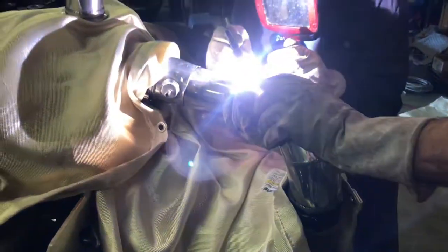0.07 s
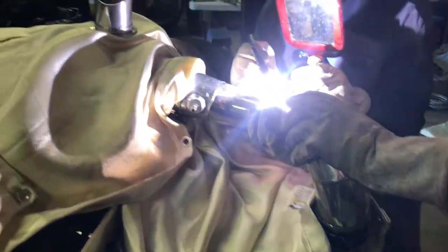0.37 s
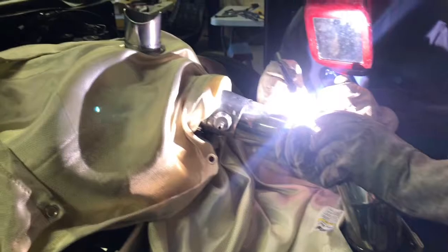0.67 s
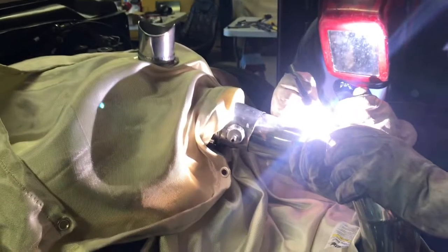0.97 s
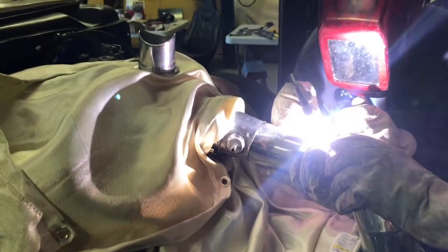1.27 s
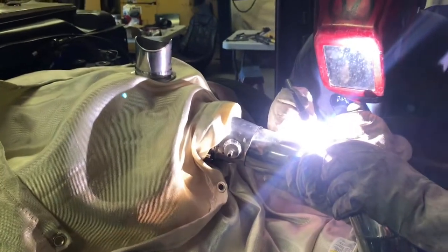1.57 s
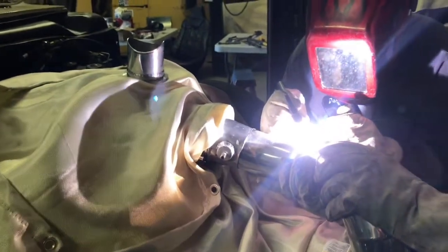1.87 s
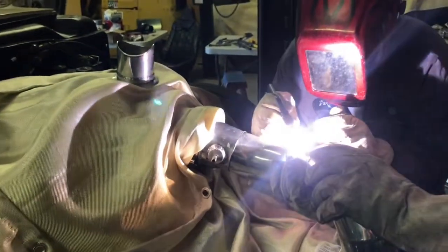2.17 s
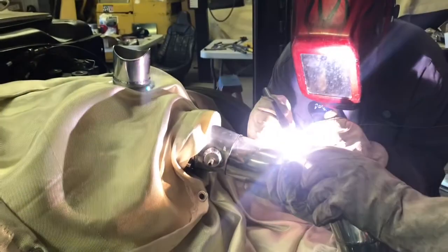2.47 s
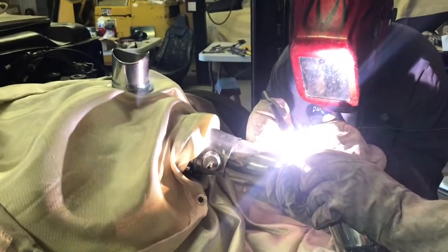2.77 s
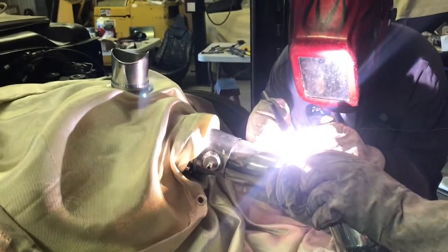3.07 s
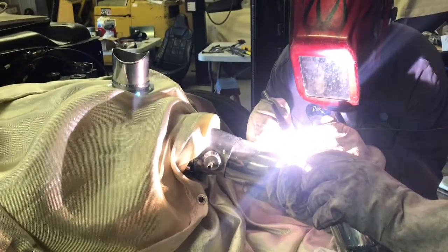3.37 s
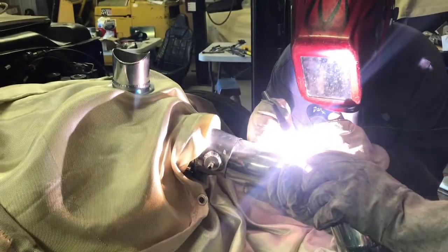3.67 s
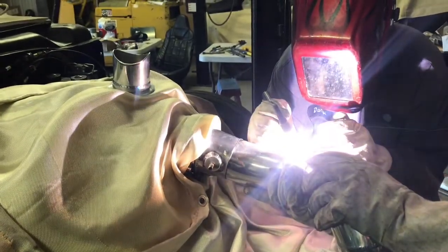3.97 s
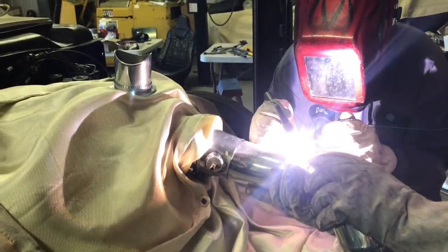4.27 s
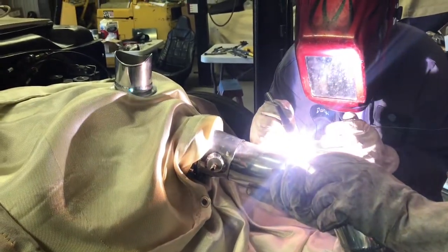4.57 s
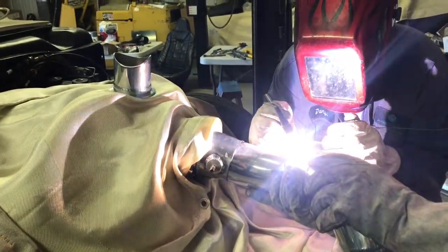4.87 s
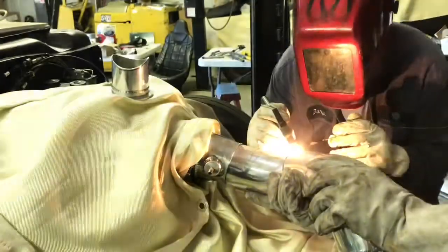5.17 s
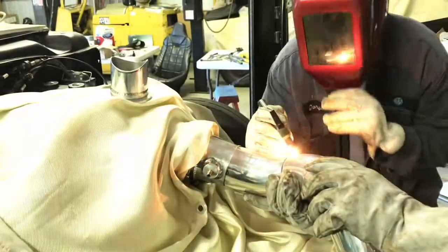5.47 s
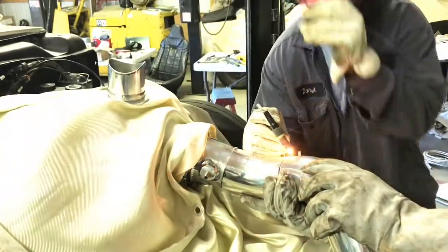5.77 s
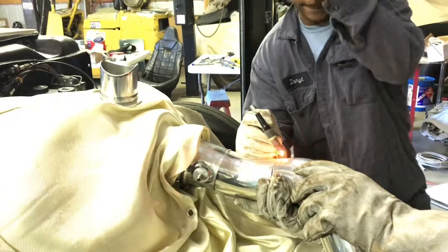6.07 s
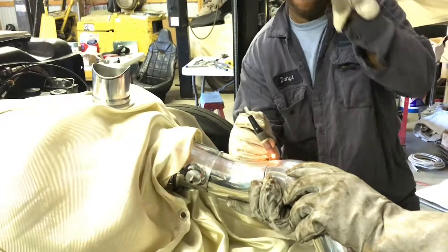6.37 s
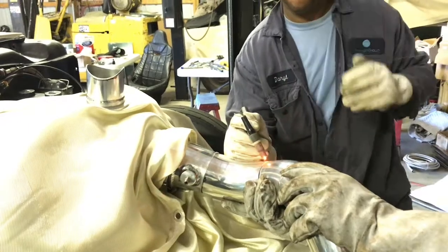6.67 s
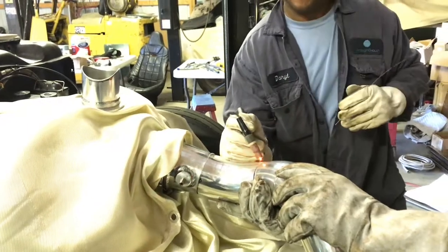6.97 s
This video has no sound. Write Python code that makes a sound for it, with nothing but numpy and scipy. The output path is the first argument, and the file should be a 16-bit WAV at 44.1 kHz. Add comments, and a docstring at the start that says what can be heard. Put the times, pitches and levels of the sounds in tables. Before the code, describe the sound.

An electric welding arc buzzes and hisses with sharp snaps, then cuts off, leaving the machine's quiet fan hum.

```python
"""AC TIG welding on a metal pipe

Twice in each mains cycle the arc dies and strikes again with a snap. It hisses as it strips the oxide
off the metal, and its pulsing heat hums at twice the mains rate. Snaps and hiss ring in the torch's cup
and echo round the workshop. The current is eased off, the starter sparks sputter and stop, and what
remains is the machine's fan and the flow of shielding gas."""
import sys
import numpy as np
from scipy import signal
from scipy.fft import rfft, irfft
from scipy.io import wavfile
from scipy.ndimage import map_coordinates

SR = 44100
rng = np.random.default_rng(int(sys.argv[2]) if len(sys.argv) > 2 else 0)


def unload_wav(signal):
    """Save mono or channel-first audio to the path in sys.argv[1] as 16-bit WAV at rate SR, clipped to [-1, 1]."""
    wavfile.write(
        sys.argv[1],
        SR,
        np.round(np.clip(np.atleast_2d(signal).T, -1, 1) * 32767).astype(np.int16),
    )


N = 318402
MS = .001
MAINS_HZ, FIRST_CYCLE_S, ARC_OFF_S = 59.9836, .01265, 5.171
TIME = np.arange(N) / SR
FREQS = np.fft.rfftfreq(N, 1 / SR)
CYCLE_STARTS = np.arange(FIRST_CYCLE_S, ARC_OFF_S, 1 / MAINS_HZ)  # the current turns positive
MS_INTO_CYCLE = (TIME - FIRST_CYCLE_S) % (1 / MAINS_HZ) / MS


def amp(db):
    """Turns decibels into a gain."""
    return 10 ** (np.asarray(db) / 20)


def unit(x):
    """Scales a signal to an average strength (rms) of 1."""
    return x / np.sqrt(np.mean(x ** 2) + 1e-20)


def curve(rows, t):
    """Reads a table's columns at the times t, along straight lines between its rows."""
    times, *columns = np.transpose(rows)
    return [np.interp(t, times, column) for column in columns]


def spectrum(rows, hz):
    """Reads a table at the frequencies hz, on a scale of octaves."""
    freqs, values = np.transpose(rows)
    return np.interp(np.log(hz + 1), np.log(freqs), values)


def noise(gain):
    """Noise of strength 1, coloured by a gain for each frequency."""
    return unit(irfft(rfft(rng.standard_normal(N)) * gain, N))


# how loud the low rumble is (time [s], level [dB])
RUMBLE_LEVEL = [(0, -80), (5.1, -66), (5.4, -53), (5.9, -56), (6.2, -67), (7.2, -60)]

def rumble(low_hz=54, width_hz=18):
    """A low rumble swells a little once the arc is out."""
    return noise(np.exp(-((FREQS - low_hz) / width_hz) ** 2)) * amp(curve(RUMBLE_LEVEL, TIME)[0])


# the notes of the machine's casing (frequency [Hz], width [Hz], level [dB])
CASING_NOTES = [(120, 4, -51), (182, 8.6, -63), (196.1, 7, -52), (274.2, 5, -55.5), (312, 18, -56),
                (355, 17, -58), (386, 6.9, -58), (585, 22, -64), (880, 22, -65), (956, 45, -59),
                (1342, 26, -59), (1460, 64, -69)]

def casing():
    """The machine's panels and ducts whirr, each at its own note."""
    power = 0
    for hz, width, db in CASING_NOTES:
        peak = 1 / (1 + (2 * (FREQS - hz) / width) ** 2)
        power += (amp(db) * unit(peak)) ** 2
    return np.sqrt(power.mean()) * noise(np.sqrt(power))


# the tone of the fan's blades (time [s], pitch [Hz], level [dB])
BLADE_TONE = [(0.3, 133.8, -36), (2.5, 134.7, -33.5), (5.0, 134.7, -34), (5.3, 135.4, -29.5),
              (6.0, 134.2, -29), (7.0, 136.6, -29.5)]
# the colour of the rushing air (frequency [Hz], relative level [dB])
AIR_COLOUR = [(20, -39), (55, -1), (100, 5), (170, 9), (230, -4.5), (330, 2.5), (450, -5.5), (780, -8.5),
              (920, -8.5), (1400, -9), (1500, -11.5), (2700, -18.5), (6500, -30), (15500, -32)]

def fan(rush_db=-41):
    """The cooling fan's passing blades make a tone, and the air they push makes a rush."""
    blade_hz, level_db = curve(BLADE_TONE, TIME)
    blades = unit(np.sin(2 * np.pi * np.cumsum(blade_hz) / SR)) * amp(level_db)
    return blades + amp(rush_db) * noise(amp(spectrum(AIR_COLOUR, FREQS)))


# the whistle of gas in the nozzle (frequency [Hz], relative level [dB])
GAS_COLOUR = [(2800, -11), (3700, 8), (4500, 6.5), (5050, -9), (5450, -1), (6400, -41), (8300, -6),
              (9600, 1.5), (10300, -10), (11300, -0.5), (12500, -1), (13800, -30), (15500, -54)]
# the echo off the helmet as it is lifted away (time [s], delay [ms], gain)
HELMET_ECHO = [(5.15, .5, .5), (5.4, .8, .55), (5.65, 1.15, .4), (6.0, 1.5, .1)]

def gas(level_db=-53.0):
    """Shielding gas flows throughout; the helmet's ever later echo makes it swish downward."""
    flow = amp(level_db) * noise(amp(spectrum(GAS_COLOUR, FREQS)))
    delay_ms, gain = curve(HELMET_ECHO, TIME)
    echo = map_coordinates(flow, [(TIME - delay_ms * MS) * SR], order=3)
    return flow + gain * echo


# how long the workshop echoes (frequency [Hz], time to fade by 60 dB [s])
ROOM_FADE = [(200, 0.28), (1500, 0.54), (4500, 0.22), (9000, 0.4), (15000, 0.58)]

def room_echoes(first_ms=4, tilt_db=-2):
    """The room answers a click with a crowd of echoes; each frequency fades at its own pace."""
    t = np.arange(SR) / SR
    echoes = rng.standard_normal(SR) * (rng.random(SR) < .1) * (t > first_ms * MS)
    hz, t, bands = signal.stft(echoes, SR, nperseg=256)
    fade_db = -60 * t / spectrum(ROOM_FADE, hz)[:, None]
    dull_db = tilt_db * np.log2(1 + hz / 2000)[:, None]
    echoes = signal.istft(bands * amp(fade_db + dull_db), SR, nperseg=256)[1]
    return echoes / np.linalg.norm(echoes)


def workshop(sound, echo_db=-11, sway_hz=0.13):
    """One pattern of room echoes slowly gives way to another."""
    angle = 2 * np.pi * sway_hz * TIME
    first, second = (signal.oaconvolve(sound, room_echoes())[:N] for _ in range(2))
    return amp(echo_db) * (np.cos(angle) * first + np.sin(angle) * second)


# the hum, loud from the arc and faint from the idling machine (time [s], level [dB])
HUM_LEVEL = [(0.1, -20.5), (1.9, -20.5), (2.5, -23.5), (3.1, -23), (4.95, -23), (5.08, -27.5), (5.17, -33),
             (5.3, -35), (5.5, -53), (7.1, -46)]
# the tones in the hum (multiple of the mains rate, relative level [dB])
HUM_TONES = [(2, 1.5), (3, -31.5), (4, -29), (6, -26.5), (8, -44), (9, -32), (16, -41.5), (18, -50)]

def hum():
    """The hot arc swells with each half cycle; unequal halves add the odd multiples."""
    angle = 2 * np.pi * MAINS_HZ * (TIME - FIRST_CYCLE_S)
    tone = sum(amp(db) * np.sin(round(multiple) * angle) for multiple, db in HUM_TONES)
    return unit(tone) * amp(curve(HUM_LEVEL, TIME)[0])


# the arc's colour between cup, pipe and gloves (frequency [Hz], relative level [dB])
ARC_TONE = [(200, -31), (600, -31.5), (1250, -18), (1650, -7.5), (2100, -17.5), (2900, -19), (3700, -6),
            (4450, -0.5), (5050, -10.5), (5700, -4.5), (6800, -14.5), (8500, -1), (10600, -15.5),
            (15800, -17)]
# the ringing of the cup and the pipe's mouth (frequency [Hz], width [Hz], relative level [dB])
CUP_NOTES = [(1003, 197, -13), (2326, 66, -11), (7880, 750, -9), (9190, 310, -3), (11430, 820, -11.5),
             (13130, 1360, -8.5)]
# the torch turns along the seam (time [s], treble beamed from the cup [dB], mids past the glove [dB])
TORCH_AIM = [(0, -1.5, -3.5), (1.4, -3, -5), (2.2, 1, -2), (2.8, 0.5, -0.5), (3.3, 0.5, 0.5),
             (4.0, -0.5, 0), (4.35, 2.5, -0.5), (4.9, -1, 1), (5.15, 2.5, -4.5)]

def cup_ring(time_s, hz, cold_hz):
    """The torch's cup rings briefly, and its colour changes with where it points."""
    power = amp(spectrum(ARC_TONE, cold_hz)) ** 2
    for note_hz, width, db in CUP_NOTES:
        power += amp(db) ** 2 / (1 + (2 * (cold_hz - note_hz) / width) ** 2) ** 2
    treble_db, mids_db = curve(TORCH_AIM, time_s)
    power *= amp(treble_db * np.exp(-((hz - 8450) / 900) ** 2)) ** 2
    power *= amp(mids_db * np.exp(-((hz - 1300) / 700) ** 2)) ** 2
    log_gain = .5 * np.log(np.r_[power, power[-2:0:-1]])
    return np.exp(np.conj(signal.hilbert(log_gain)))[:len(hz)]  # no ringing before the strike


# hot gas carries sound faster and raises the cup's notes (time [s], pitch factor)
CUP_HEAT = [(0, 0.98), (1.6, 0.99), (2.4, 1.005), (4.0, 1.02), (4.3, 1.037), (4.95, 1.016), (5.17, 0.976)]
# echoes off the pipe and the helmet (delay [ms], gain)
NEAR_ECHOES = [(0.699, 0.099), (1.352, 0.058), (2.4, 0.017)]
# the echo off the moving hand that feeds the filler rod (time [s], delay [ms], gain)
HAND_ECHO = [(0, 0.86, .2), (1.8, 0.814, 0.058), (4.0, 0.83, 0.02), (4.4, 0.74, 0.11), (5.15, 0.77, 0.19)]

def torch_response(time_s, bounce=0.94, bounce_ms=.23, size=2048):
    """A click at this moment rings round the cup and bounces off pipe, helmet and hand."""
    hz = np.fft.rfftfreq(size, 1 / SR)
    cold_hz = hz / curve(CUP_HEAT, time_s)[0]
    response = cup_ring(time_s, hz, cold_hz)
    trip = np.exp(-2j * np.pi * hz * bounce_ms * MS)
    response *= (bounce + trip) / (1 + bounce * trip)  # trips from cup to pipe only smear it in time
    echoes = [*NEAR_ECHOES, curve(HAND_ECHO, time_s)]
    response *= 1 + sum(gain * np.exp(-2j * np.pi * cold_hz * ms * MS) for ms, gain in echoes)
    ring = irfft(response)
    return ring / np.linalg.norm(ring)


def torch(sound, size=4096):
    """Overlapping pieces of the arc's sound pass through the cup as it is just then."""
    out, window = np.zeros(N + size), signal.get_window("hann", size)
    padded = np.r_[np.zeros(size // 2), sound]
    for start in range(0, int(ARC_OFF_S * SR) + size, size // 2):
        piece = signal.fftconvolve(padded[start:start + size] * window, torch_response(start / SR))
        out[start:start + len(piece)] += piece
    return out[size // 2:][:N]


# the starter sparks as the arc fails (time [s], relative level [dB])
SPARK_LEVEL = [(4.95, -47), (5.0, -47), (5.08, -24), (5.11, -23), (5.15, -17.5), (5.17, -22)]

def sparks(first_ms=1.2, second_ms=9.0, half_width_ms=2.0, density=0.32, brightness=0.96):
    """A burst of tiny, bright starter sparks bridges each gap in the failing arc."""
    centres_ms = (first_ms, second_ms, first_ms + 1 / MAINS_HZ / MS)
    bursts = sum(np.exp(-((MS_INTO_CYCLE - ms) / half_width_ms) ** 2) for ms in centres_ms)
    crackle = rng.standard_normal(N) * (rng.random(N) < density)
    crackle = unit(signal.lfilter([1, -brightness], [1], crackle))
    failing = (TIME > SPARK_LEVEL[0][0]) & (TIME < ARC_OFF_S)
    return crackle * bursts * amp(curve(SPARK_LEVEL, TIME)[0]) * failing


# the hiss builds as the arc strips the oxide and drops suddenly when the filler rod is dipped (time [s],
# relative level [dB])
HISS_LEVEL = [(0, -26.5), (0.2, -28), (0.73, -24.3), (0.95, -25), (1.05, -28), (1.55, -30), (1.92, -22),
              (2.2, -30), (2.92, -27), (3.21, -17), (3.45, -21), (4.06, -21.5), (4.11, -30), (4.32, -26),
              (4.78, -21.5), (4.88, -27.5), (5.17, -32)]

def oxide_hiss(boost_db=0.47, flutter_db=2.1, cleaning_ms=7, rest_db=-20, body_db=-12, body_hz=2200):
    """Arc spots race over the oxide while the electrode is positive; harder work sounds fuller."""
    hiss_db = curve(HISS_LEVEL, TIME)[0]
    pulses = np.exp(-abs(2 * MS_INTO_CYCLE / cleaning_ms - 1) ** 6) + amp(rest_db)
    fullness = amp(body_db + 0.099 * (hiss_db - hiss_db.max()))
    body = noise(np.exp(-(FREQS / body_hz) ** 2)) * fullness
    hiss = rng.standard_normal(N) + body
    flutter = noise(np.exp(-(FREQS / 200) ** 2))  # random wobble, up to about 200 Hz
    return hiss * pulses * amp(boost_db + hiss_db + flutter_db * flutter) * (TIME < ARC_OFF_S)


def clicks(times, gains, lengths_s, fizz=0.056, fizz_ms=0.62, size=64):
    """Short bell-shaped puffs of pressure, each followed by its own wisp of fizz."""
    hz = np.fft.rfftfreq(2 * size, 1 / SR)
    samples = (times * SR).astype(int)
    centre_s = (times - (samples - size) / SR)[:, None]  # a puff can fall between two samples
    omega = 2 * np.pi * hz
    bells = np.exp(-1j * omega * centre_s - .5 * (omega * lengths_s[:, None]) ** 2)
    puffs = irfft(bells * (1 - (2 * hz / SR) ** 8), axis=1)  # soften the very top of the treble
    age_s = np.arange(2 * size) / SR - centre_s
    puffs += fizz * rng.standard_normal(puffs.shape) * np.exp(-abs(age_s) / (fizz_ms * MS)) * (age_s > 0)
    out = np.zeros(N)
    np.add.at(out, samples[:, None] + np.arange(-size, size), puffs * gains[:, None])
    return out


# runs of hard snaps (time [s], number of snaps, spacing [mains cycles], relative level [dB])
SNAP_RUNS = [(0.146, 2, 9, 6.7), (1.98, 2, 1, 7.4), (2.08, 2, 1, 7.9), (2.347, 1, 1, 7.7),
             (2.53, 2, 1, 6.2), (2.713, 3, 3, 7.3), (3.38, 2, 1, 6), (3.447, 2, 3, 7.9), (3.48, 2, 3, 7.6),
             (3.68, 3, 1, 8.2), (3.764, 2, 1, 8.2), (3.964, 2, 1, 5.3), (4.064, 1, 1, 7), (4.33, 2, 3, 7),
             (4.364, 4, 3, 7.4), (4.531, 4, 3, 7.6), (4.747, 2, 1, 7.7), (4.814, 2, 3, 7), (4.931, 1, 1, 6),
             (4.964, 2, 1, 4), (5.047, 2, 1, 3.3)]

def with_snaps(level_db, falter_db=-5, after_db=0.5, after_cycles=3):
    """The arc falters just before a hard snap; the few strikes after a run are a touch louder."""
    level_db = level_db.copy()
    runs = []
    for time_s, count, spacing, db in SNAP_RUNS:
        cycles = np.argmin(abs(CYCLE_STARTS - time_s)) + round(spacing) * np.arange(round(count))
        level_db[cycles - 1] += falter_db
        level_db[cycles[-1] + 1:][:after_cycles] += after_db
        runs.append((cycles, db))
    for cycles, db in runs:
        level_db[cycles] = db
    return level_db


# strikes start firm, weaken on the molten pool and fade as the current is eased off
# (time [s], relative forward level [dB], relative return level [dB])
STRIKE_LEVELS = [(0, 2, 3.5), (0.35, 4.5, 5), (0.75, 3, 4.5), (1.4, 6, 3.5), (1.9, 3, 5), (2.4, -0.5, -6),
                 (2.8, 3, -0.5), (3.2, -6.5, -10), (3.6, 1, -3), (4.1, -7, -7), (4.45, 7, -4.5),
                 (4.95, 1, -4), (5.0, -14, -21), (5.17, -15, -22)]
# the wait before a strike; late ones are sharp and uneven (time [s], delay [ms], length [ms], spread [dB])
STRIKE_TIMING = [(0, 0.18, 0.023, 1), (1.85, 0.12, 0.024, 0.5), (2.25, .33, 0.0017, 4.5),
                 (4.9, .34, 0.0034, 3), (5.05, 1.42, 0.0052, 6)]

def strikes(forward_boost_db=1.5, return_boost_db=2, return_ms=7.195, jitter_ms_per_db=0.0042):
    """The arc strikes with a puff of heated gas as the current flows forward, and again as it returns."""
    forward_db, return_db = curve(STRIKE_LEVELS, CYCLE_STARTS)
    delay_ms, length_ms, spread_db = curve(STRIKE_TIMING, CYCLE_STARTS)
    chance = rng.standard_normal((len(CYCLE_STARTS), 6)).T
    forward_db = with_snaps(forward_db + forward_boost_db + spread_db * np.clip(chance[0], -2, 1))
    return_db += return_boost_db + 0.17 * spread_db * chance[1]
    late_ms = delay_ms + jitter_ms_per_db * spread_db * chance[2:4]  # an uneven arc keeps worse time
    lengths_s = length_ms * MS * np.exp(0.094 * chance[4:])
    forward = clicks(CYCLE_STARTS + late_ms[0] * MS, amp(forward_db), lengths_s[0])
    back = clicks(CYCLE_STARTS + (late_ms[1] + return_ms) * MS, amp(return_db), lengths_s[1])
    return forward + back


def scene():
    """The arc in the workshop, over the machine, the gas and the rumble."""
    arc = torch(strikes() + oxide_hiss() + sparks())
    return (arc + workshop(arc) + hum() + fan() + casing() + gas() + rumble())[None]


def record(dry, top_hz=16000):
    """Clips any peak beyond full scale, then takes off the highest treble."""
    lowpass = signal.firwin(511, top_hz, window=("kaiser", 9), fs=SR)
    return signal.oaconvolve(np.clip(dry, -1, 1), lowpass[None], "same")


dry = scene()
out = record(dry)
unload_wav(out)
```